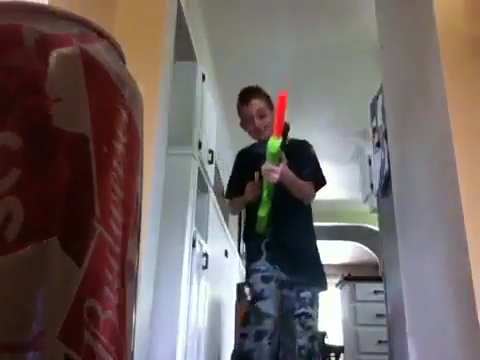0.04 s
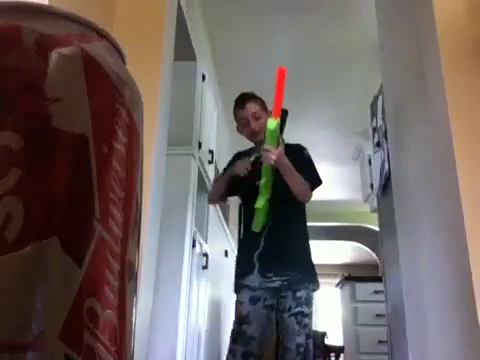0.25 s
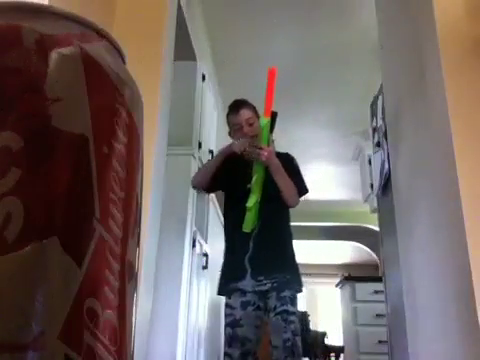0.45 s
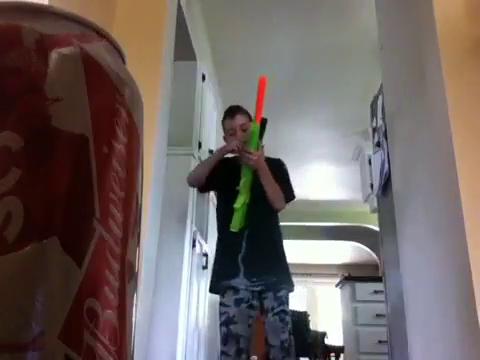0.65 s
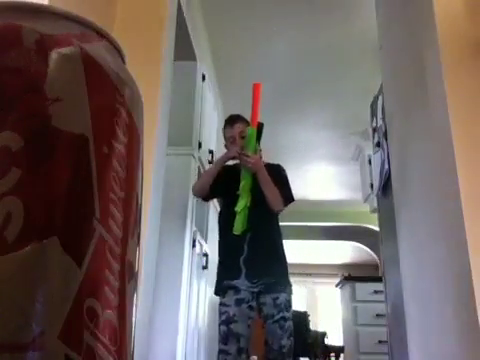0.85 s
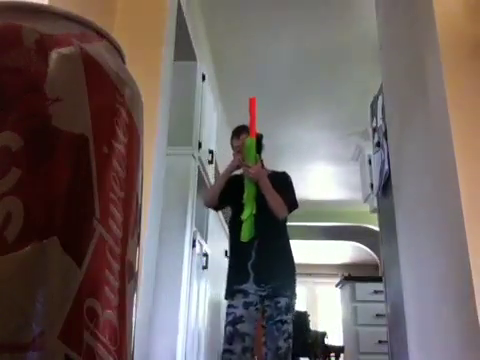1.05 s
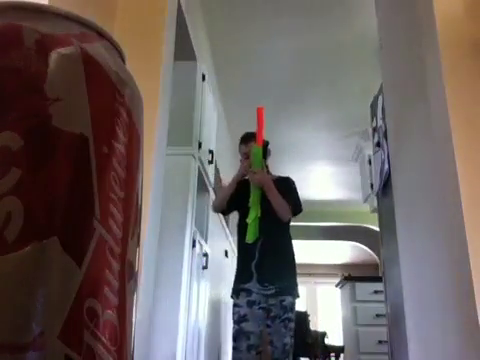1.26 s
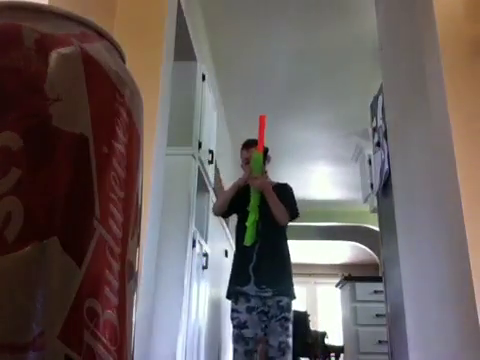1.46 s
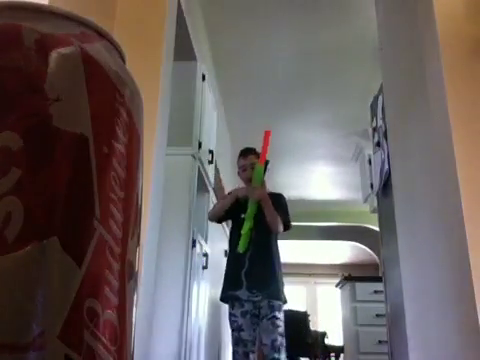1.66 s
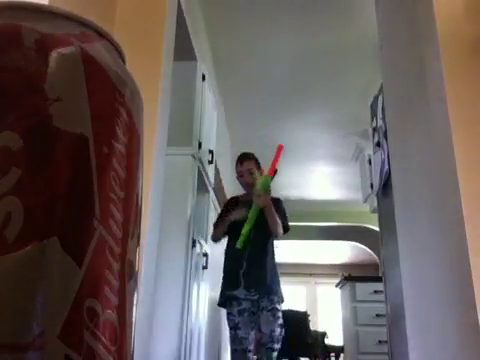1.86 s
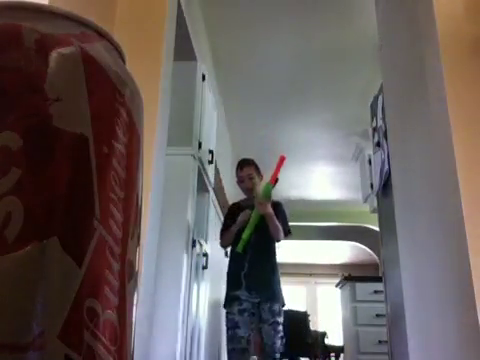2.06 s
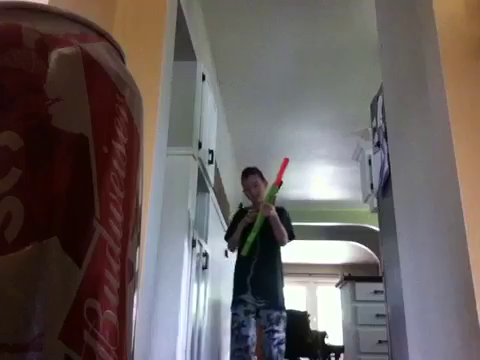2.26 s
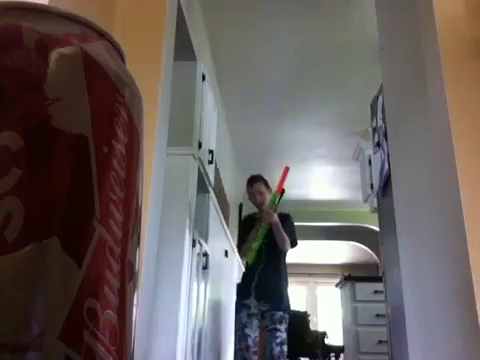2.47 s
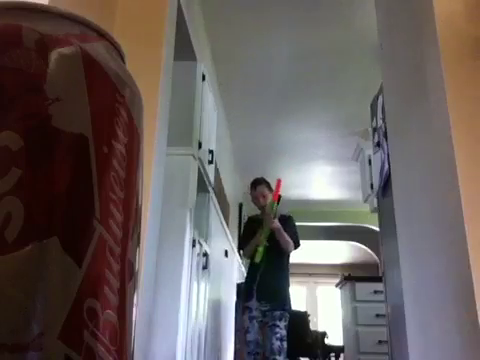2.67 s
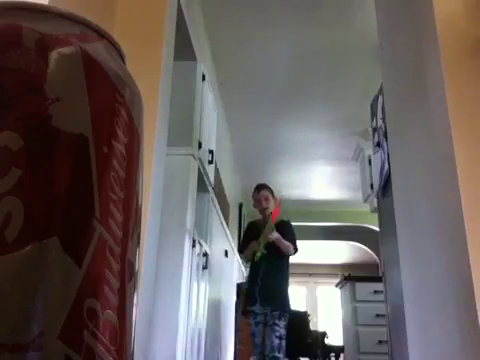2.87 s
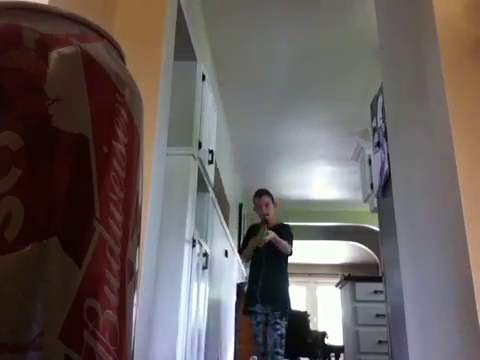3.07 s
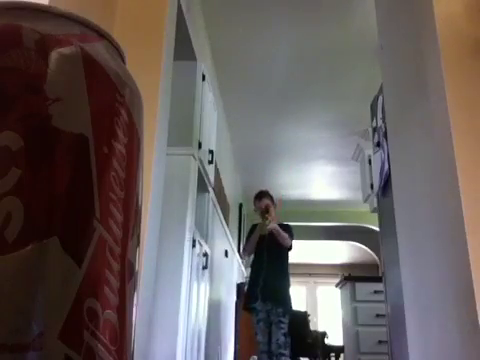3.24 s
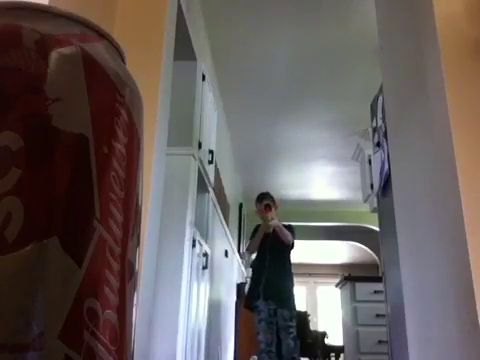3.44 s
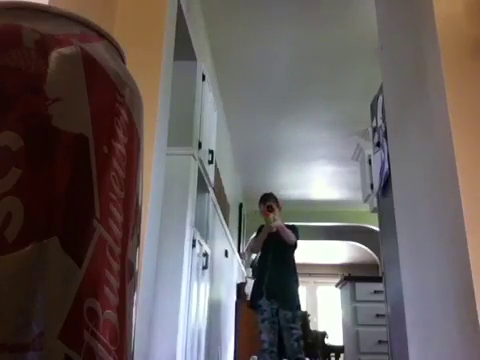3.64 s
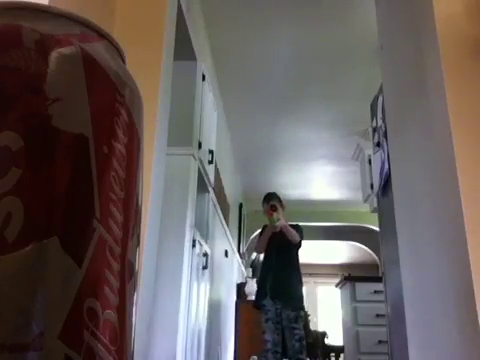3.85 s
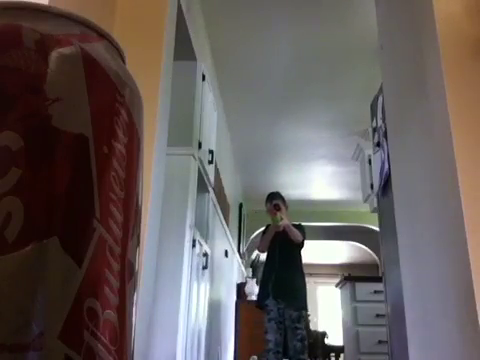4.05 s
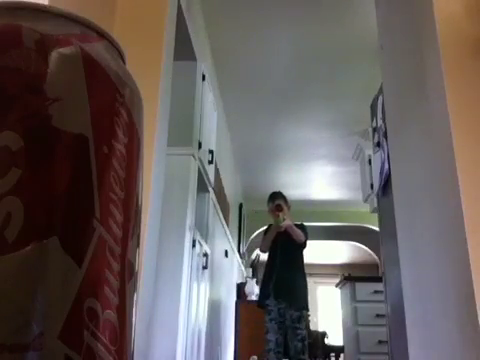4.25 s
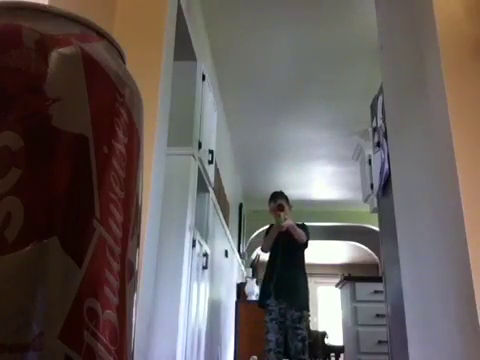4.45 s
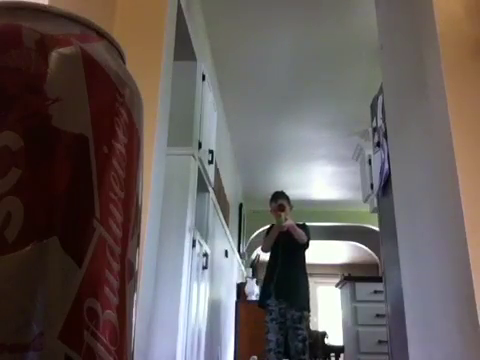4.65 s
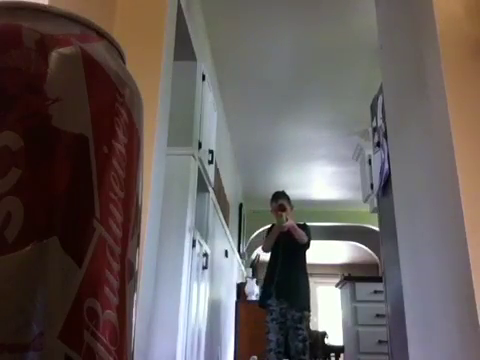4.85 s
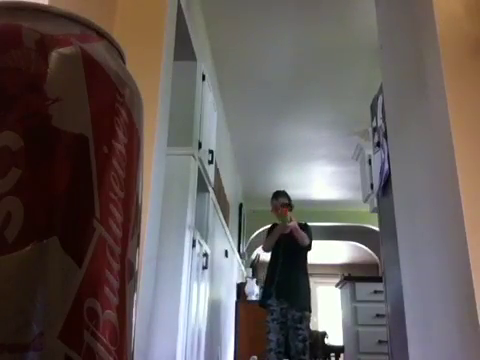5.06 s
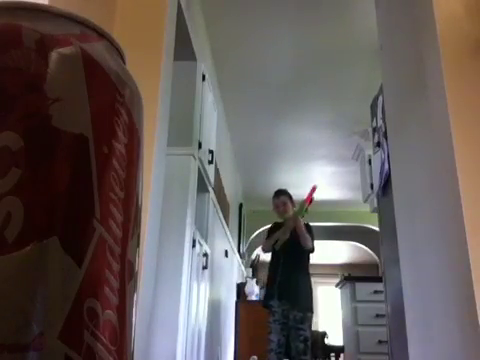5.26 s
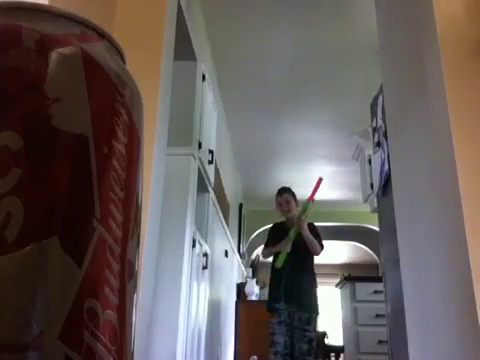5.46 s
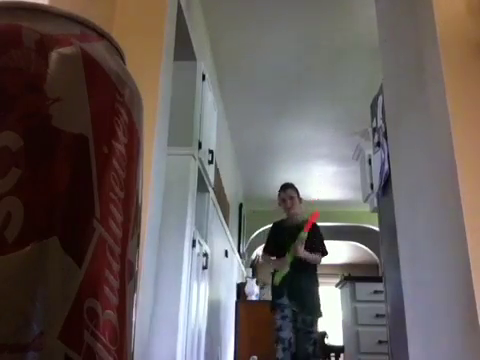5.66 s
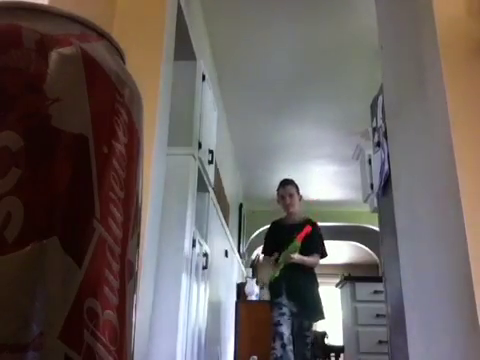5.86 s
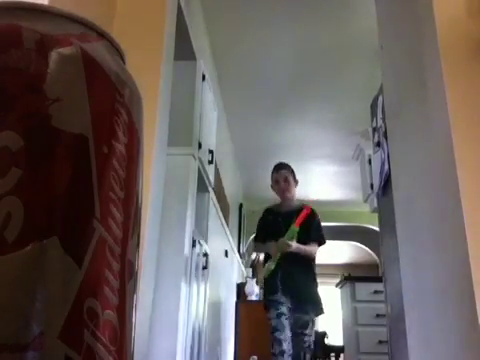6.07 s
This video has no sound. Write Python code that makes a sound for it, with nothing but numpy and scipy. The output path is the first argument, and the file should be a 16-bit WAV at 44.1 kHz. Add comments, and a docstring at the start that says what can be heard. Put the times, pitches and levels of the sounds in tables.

```python
"""A narrow kitchen, where a child loads, cocks and fires a toy dart blaster while backing away.
Over a low household rumble the slide scrapes and the hollow plastic shell clacks. The spring plunger
slams a puff of air through the barrel; the foam dart strikes right beside the microphone and drops.
A few soft footfalls follow. Gain control ducks on the loudest hits and lets the room creep back."""
import sys
import numpy as np
from scipy import signal
from scipy.fft import rfft, irfft
from scipy.io import wavfile

SR = 44100
rng = np.random.default_rng(int(sys.argv[2]) if len(sys.argv) > 2 else 0)


def to_wav(sig):
    """Store sig (one row per channel, or 1-D mono) as 16-bit WAV at the path in sys.argv[1].

    Samples outside -1..1 are clipped; the rate is SR.
    """
    pcm = np.clip(np.atleast_2d(sig), -1, 1) * 32767
    pcm = np.round(pcm).astype(np.int16)
    wavfile.write(sys.argv[1], SR, pcm.T)  # frames by channels


N = 269451

# steady rumble and hiss: freq_hz, level_db
ROOM_TONE_SPECTRUM = [(20, -17), (40, -30), (69, -25), (88, -12), (118, -15), (160, 1.5), (199, -3),
                      (291, 0.5), (451, -6), (577, -8.5), (800, -15), (1860, -17), (3790, -23.5),
                      (17000, -27.5)]
# strokes of the slide, and at 1.60 s a hand rubbing the body: peak_s, level_db, swell_s, release_s,
# tilt_db_per_octave
RUB_STROKES = [(.005, -43.5, 0.027, .13, .5), (.185, -53.5, 0.028, 0.16, 2),
               (1.60, -60.5, 0.2, 0.15, 1.5), (2.125, -65, 0.11, .2, -2), (2.21, -49.5, 0.12, .09, -1.5)]
# plastic rubbing on plastic: freq_hz, level_db
RASP_SPECTRUM = [(100, -15.5), (400, 0), (800, 1.5), (1300, -1.5), (1800, 4), (2600, -6.5), (4500, -6),
                 (7000, -10.5), (10000, -9.5), (16000, -26)]
# blows on the shell: start_s, level_db, chatter_s, tilt_db_per_octave, hollow_db
SHELL_CLACKS = [(.157, -38, 0.011, -7, 22), (0.1813, -13.5, 0.0022, 0.5, 22), (0.2322, -26, 0.0056, -8, 8),
                (0.4882, -29.5, 0.0084, -4.5, 10), (1.2196, -29, 0.004, 3.5, -8),
                (1.285, -30, 0.0065, 8, 4), (2.0264, -22, 0.0058, 0.5, 10.5),
                (2.1208, -24.5, 0.0019, -3, 4), (2.223, -18.5, 0.0035, -4, -2),
                (2.5118, -24.5, 0.006, -5, 11.5), (2.532, -23, 0.0041, -15, 13),
                (2.5416, -7.5, 0.0048, 2, 0), (2.5492, 7.5, 0.0025, 1.5, -11),
                (2.5544, -8.5, 0.0021, 5, -5), (2.835, -28.5, 0.02, -4.5, -13),
                (2.9714, -31, 0.021, 2, -21), (4.884, -24, 0.011, 1.5, -1.5), (4.928, 6.5, 0.0049, 3, -13),
                (5.7707, -29.5, .003, -1, 1.5), (6.065, -32, 0.0024, 3, 7), (6.0802, -32.5, .004, -7, 7)]
# plastic cracking against plastic: freq_hz, level_db
CRACK_SPECTRUM = [(40, -35.5), (110, -35.5), (250, -6), (400, -14), (520, -4.5), (850, 3.5), (1450, 1),
                  (2200, 2.5), (3500, -0.5), (6000, -11.5), (10000, -16.5), (13500, -29), (17000, -33.5)]
# ring of the plastic shell: pitch_hz, level_db, t60_s
SHELL_MODES = [(519, -17, 0.051), (726, -16, 0.06), (1017, -9.5, 0.14), (1142, -7, .04), (1250, -13, 0.039),
               (1817, -11.5, .03), (2200, -8, 0.025), (2402, -10.5, .025), (2584, -14.5, .025),
               (2890, -18, 0.022), (4065, -24, 0.02), (4585, -25.5, .02)]
# ring of the air inside the shell: pitch_hz, level_db, t60_s
HOLLOW_MODES = [(816.2, 0.5, 0.077), (890, -12.5, .02), (1110, -15, .03), (1430, -14.5, 0.014),
                (3170, -16.5, 0.0055)]
# the puff of air: freq_hz, level_db
PUFF_SPECTRUM = [(40, -24.5), (90, -27), (160, -7), (500, -1), (780, 7.5), (1100, 11), (1500, -1.5),
                 (2100, 1.5), (4000, -6), (7000, -10), (11000, -15), (14000, -17), (17000, -19.5)]
# air column of plunger tube and barrel: pitch_hz, level_db, t60_s
BARREL_MODES = [(158, -24, 0.09), (245, -16, .05), (307, -16, 0.05), (441.5, -12, .1), (528, -12.5, 0.07),
                (677, -8, 0.063), (728, -8, 0.071), (810, -8, 0.045), (957, -10.5, .03), (1060, -10.5, .04),
                (1210, -13.5, .04), (1324, -11, .05), (1880, -10.5, .02)]
# the dart clipping an edge: freq_hz, level_db
GRAZE_SPECTRUM = [(100, -21), (500, -2.5), (1000, -6), (1500, -2), (3500, 0.5), (5800, -2.5), (7100, 5),
                  (8500, -7.5), (10300, 0), (13000, -13), (17000, -14)]
# the dart's hit and bounces: start_s, level_db, tilt_db_per_octave, thump_db, room_db
DART_HITS = [(5.128, 17, 0, -17, -9), (5.1336, 2, -5, -1, 1.5), (5.1411, -9, 5, 4, -4.5),
             (5.1513, -8, -5.5, -1.5, -5.5), (5.2145, -6, -4, -8, 2)]
# slap of the soft tip: freq_hz, level_db
SLAP_SPECTRUM = [(40, -32), (120, -25), (600, 2.5), (1500, 7.5), (3000, 1.5), (6000, -15.5), (10000, -22),
                 (17000, -31)]
# ring of the small object the dart strikes: pitch_hz, level_db, t60_s
KNOCK_MODES = [(620, -14, .012), (1020, 2, 0.013), (1890, 0, 0.02), (2650, -5, 0.0092),
               (3100, -8.5, 0.0069), (4800, -11, 0.0045)]
# thump of the board under that object: pitch_hz, level_db, t60_s
BOARD_MODES = [(182, -14.5, .05), (240, -3.5, 0.039), (310, -6, 0.094), (396, -6, .04), (495, -8, .03),
               (690, -10.5, 0.028)]
# feet landing on the floor: start_s, level_db
FOOTFALLS = [(5.582, -31.5), (5.6033, -19.5), (5.9915, -25), (6.0798, -25.5)]
# one dull footfall: freq_hz, level_db
FOOT_SPECTRUM = [(60, -26), (130, 8), (350, 9), (750, -2.5), (1500, -3), (2200, -27), (5000, -31),
                 (16000, -38)]
# decay of the kitchen's reverb: freq_hz, t60_s
KITCHEN_DECAY = [(120, 0.22), (400, 0.54), (1000, 0.49), (2800, 0.43), (7000, 0.43), (11000, 0.4),
                 (16000, 0.29)]
# early reflections off cupboards, floor and ceiling: delay_s, gain
KITCHEN_ECHOES = [(.0021, 0.078), (.0047, -0.43), (.0078, .22), (.0118, .25), (0.017, -0.092)]


def amp(db):
    """Decibels to gain."""
    return 10 ** (np.asarray(db) / 20)


def unit(x):
    """Scales to an energy of one."""
    return x / np.sqrt(np.sum(x ** 2) + 1e-20)


def curve_at(points, hz):
    """Reads a curve drawn in straight lines over log frequency."""
    points_hz, values = np.transpose(points)
    return np.interp(np.log(hz + 1), np.log(points_hz + 1), values)


def add(mix, start_s, sound):
    """Drops a sound into the mix at a time."""
    part = mix[max(round(start_s * SR), 0):][:len(sound)]
    part += sound[:len(part)]


def layered(*sounds):
    """Stacks sounds that start together."""
    out = np.zeros(max(map(len, sounds)))
    for sound in sounds:
        add(out, 0, sound)
    return out


def click(spectrum, tilt=0, size=4096):
    """A sharp-fronted click with the given colour, tilted above 500 Hz by dB per octave."""
    hz = abs(np.fft.fftfreq(size, 1 / SR))
    octaves = np.log2(np.maximum(hz, 500) / 2000)
    log_gain = np.log(amp(curve_at(spectrum, hz) + tilt * octaves))
    minimum_phase = np.exp(np.conj(signal.hilbert(log_gain)))
    return unit(np.fft.ifft(minimum_phase).real[:size // 2])


def ring(modes, tilt=0, size=16384):
    """A struck body's dying sines; level and tilt in dB per octave set each one's energy."""
    t, out = np.arange(size) / SR, np.zeros(size)
    for hz, db, t60_s in modes:
        mode = np.sin(2 * np.pi * hz * t) * amp(-60 * t / t60_s)
        out += amp(db + tilt * np.log2(hz / 2000)) * unit(mode)
    return out


def chatter(decay_s, rise_share=0.14, size=4096):
    """A spray of tiny contacts that swells and dies, with no colour of its own."""
    age = np.arange(size) / SR / max(decay_s, 1 / SR)
    fade = np.exp(-age) * (1 - np.exp(-age / rise_share))
    spray = rng.standard_normal(size) * fade
    for _ in range(2):  # flatten the colour, then shape the fade again
        spectrum = rfft(spray)
        spray = irfft(spectrum / (abs(spectrum) + 1e-12)) * fade ** (1 / 3)
    return unit(spray)


def room_tone(level_db=-58.5):
    """The bed: low household rumble under microphone hiss."""
    colour = amp(curve_at(ROOM_TONE_SPECTRUM, np.fft.rfftfreq(N, 1 / SR)))
    noise = irfft(rfft(rng.standard_normal(N)) * colour, N)
    return amp(level_db) * np.sqrt(N) * unit(noise)


def plastic_rubs(slips_per_s=4000, spread_db=3.0, fade_db=20):
    """Plastic rubs on plastic in tiny slips; a stroke moves by fade_db over its swell and its release."""
    slips = (rng.random(N) < slips_per_s / SR) * rng.choice([-1, 1], N)
    slips = slips * amp(spread_db * np.minimum(rng.exponential(1, N), 4))
    t, out = np.arange(N) / SR, np.zeros(N)
    for peak_s, db, swell_s, release_s, tilt in RUB_STROKES:
        rasp = unit(signal.oaconvolve(slips, click(RASP_SPECTRUM, tilt))[:N]) * np.sqrt(N)
        off_peak = np.maximum((peak_s - t) / swell_s, (t - peak_s) / release_s)
        out += rasp * amp(db - fade_db * off_peak)
    return out


def shell_clacks(crack_db=-2, plastic_db=-4, hollow_trim_db=-9, low_cut_hz=370, hollow_cut_hz=600):
    """Catches and stops knock the shell: a crack, ringing plastic and the hollow air inside."""
    out = np.zeros(N)
    hollow_low_cut = signal.butter(2, hollow_cut_hz, "highpass", fs=SR)
    hollow = signal.lfilter(*hollow_low_cut, ring(HOLLOW_MODES))
    for start_s, db, chatter_s, tilt, hollow_db in SHELL_CLACKS:
        crack = amp(crack_db) * click(CRACK_SPECTRUM, tilt)
        plastic = amp(plastic_db) * ring(SHELL_MODES, tilt)
        body = layered(crack, plastic, amp(hollow_trim_db + hollow_db) * hollow)
        add(out, start_s, amp(db) * signal.fftconvolve(chatter(chatter_s), body))
    # so small a shell radiates little bass
    return signal.lfilter(*signal.butter(2, low_cut_hz, "highpass", fs=SR), out)


def plunger_shot(fire_s=4.9275, slam_s=4.9345, rush_db=5, slam_db=7, barrel_db=8):
    """Air hisses past the dart, then the plunger slams home and the barrel pops."""
    out = np.zeros(N)
    rush = signal.fftconvolve(chatter(decay_s=0.012), click(PUFF_SPECTRUM, tilt=3))
    add(out, fire_s, amp(rush_db) * rush)
    pop = layered(amp(slam_db) * click(PUFF_SPECTRUM), amp(barrel_db) * ring(BARREL_MODES))
    add(out, slam_s, signal.fftconvolve(chatter(decay_s=0.0094), pop))
    return out


def dart_impact(graze_s=5.1201, graze_db=3, graze_room_db=-17, slap_db=-6, knock_db=-6, board_db=-4):
    """Close and nearly dry: the dart ticks an edge, its soft tip crushes into a knock, and it bounces."""
    close, reverb_send = np.zeros((2, N))
    tick = amp(graze_db) * signal.fftconvolve(chatter(decay_s=0.0008), click(GRAZE_SPECTRUM))
    add(close, graze_s, tick)
    add(reverb_send, graze_s, amp(graze_room_db) * tick)
    for start_s, db, tilt, thump_db, room_db in DART_HITS:
        slap = signal.fftconvolve(chatter(decay_s=0.0005), click(SLAP_SPECTRUM, tilt))
        board = signal.fftconvolve(chatter(decay_s=0.004), ring(BOARD_MODES))
        hit = amp(db) * layered(amp(slap_db) * slap, amp(board_db + thump_db) * board)
        knock = amp(db + knock_db) * ring(KNOCK_MODES, tilt)
        add(close, start_s, layered(hit, knock))
        add(reverb_send, start_s, amp(room_db) * hit)  # the small object's knock stays dry
    return close + kitchen_reverb(reverb_send)


def dart_thud(start_hz=473, floor_hz=166, sag_s=0.016, length_s=0.046, level_db=-23.5, room_db=-12):
    """A short low thud that sinks in pitch under the dart's first hit."""
    t, out = np.arange(0, length_s, 1 / SR), np.zeros(N)
    pitch_hz = floor_hz + (start_hz - floor_hz) * np.exp(-t / sag_s)
    swell = amp(level_db) * np.sin(np.pi * t / length_s)
    add(out, DART_HITS[0][0], swell * np.sin(2 * np.pi * np.cumsum(pitch_hz) / SR))
    return out + amp(room_db) * kitchen_reverb(out)


def footsteps(sole_s=0.0022):
    """Soles meet the floor, soft and dull."""
    out = np.zeros(N)
    for start_s, db in FOOTFALLS:
        add(out, start_s, amp(db) * signal.fftconvolve(chatter(sole_s), click(FOOT_SPECTRUM)))
    return out


def kitchen_reverb(sound, tap_share=0.15, rise_s=0.00075, low_cut_hz=300):
    """A diffuse tail of sparse taps, each band dying at its own speed; cupboards soak up the bass."""
    taps = rng.choice([-1., 1.], SR) * (rng.random(SR) < tap_share)
    taps *= 1 - np.exp(-np.arange(SR) / SR / rise_s)
    hz, t, bands = signal.stft(taps, SR, nperseg=256)
    decay = amp(-60 * t / curve_at(KITCHEN_DECAY, hz)[:, None])
    tail = signal.istft(bands * decay, SR, nperseg=256)[1]
    tail = signal.lfilter(*signal.butter(1, low_cut_hz, "highpass", fs=SR), tail)
    return signal.fftconvolve(sound, unit(tail))[:N]


def across_kitchen(sound, wet_db, echo_db, start_m=0.86, far_m=2.76, back_m_per_s=0.93, radius_m=2.6):
    """Echoes and tail grow around the direct sound as the child backs away, then stands to aim."""
    distance_m = np.minimum(start_m + back_m_per_s * np.arange(N) / SR, far_m)
    send = sound * distance_m / radius_m  # at the room radius the send equals the direct sound
    out = sound + amp(wet_db) * kitchen_reverb(send)
    for delay_s, gain in KITCHEN_ECHOES:
        add(out, delay_s, amp(echo_db) * gain * send)
    return out


def scene(low_cut_hz=125):
    """Blaster and feet across the kitchen, the dart close by; the small microphone takes little bass."""
    handling = across_kitchen(shell_clacks() + plastic_rubs() + footsteps(), wet_db=0, echo_db=0.5)
    shot = across_kitchen(plunger_shot(), wet_db=1, echo_db=-2.5)
    action = handling + shot + dart_impact() + dart_thud()
    low_cut = signal.butter(4, low_cut_hz, "highpass", fs=SR, output="sos")
    return (signal.sosfilt(low_cut, action) + room_tone())[None]


def record(dry, threshold_db=-14, recovery_db_per_s=6.5, slope=0.51, low_cut_hz=75, high_cut_hz=17600):
    """Gain control dips on the loudest peaks and creeps back; overloads clip; lows and highs roll off."""
    smooth = np.ones(88) / 88  # 2 ms average
    level_db = 10 * np.log10(signal.lfilter(smooth, 1, dry[0] ** 2) + 1e-12)
    fall_db = np.arange(N) * recovery_db_per_s / SR
    held_db = np.maximum.accumulate(level_db + fall_db) - fall_db  # each peak is held and sinks slowly
    duck_db = signal.lfilter(smooth, 1, slope * np.maximum(held_db - threshold_db, 0))
    clipped = np.clip(dry * amp(-duck_db), -1, 1)
    thinned = signal.lfilter(*signal.butter(2, low_cut_hz, "highpass", fs=SR), clipped)
    high_cut = signal.firwin(511, high_cut_hz, window=("kaiser", 9), fs=SR)
    return signal.oaconvolve(thinned, high_cut[None], "same")


dry = scene()
out = record(dry)
to_wav(out)
```